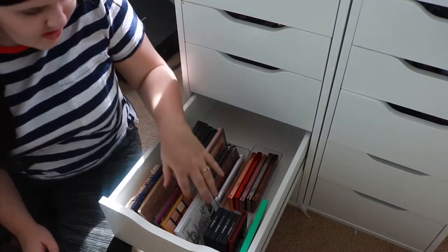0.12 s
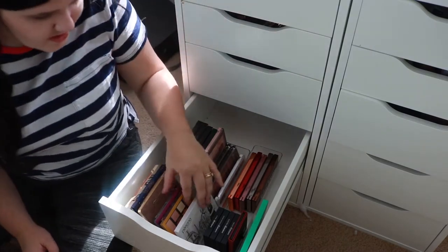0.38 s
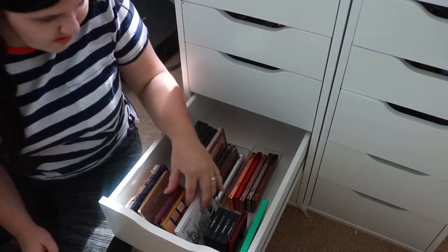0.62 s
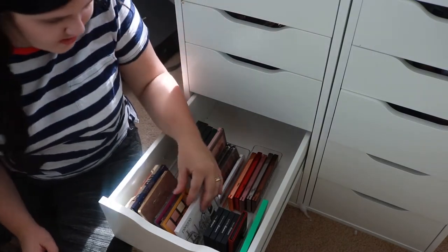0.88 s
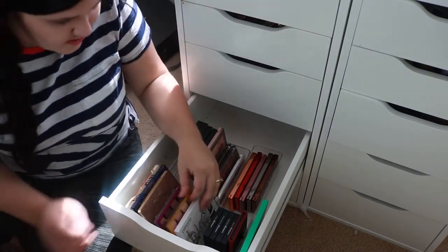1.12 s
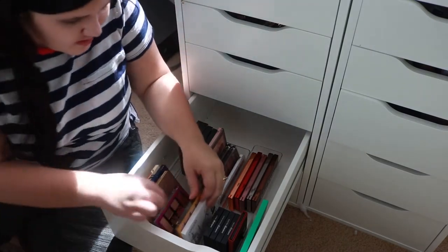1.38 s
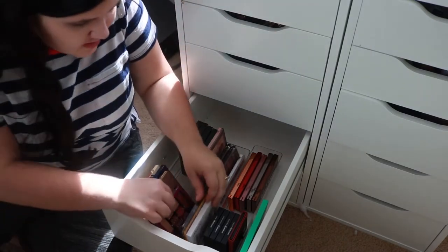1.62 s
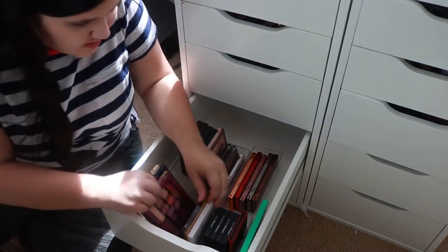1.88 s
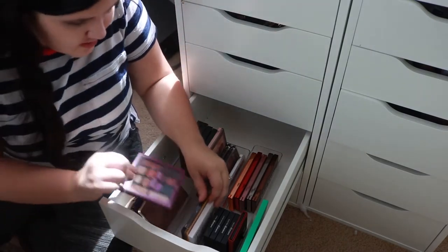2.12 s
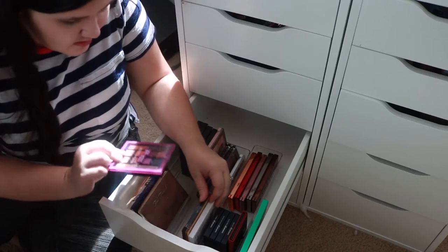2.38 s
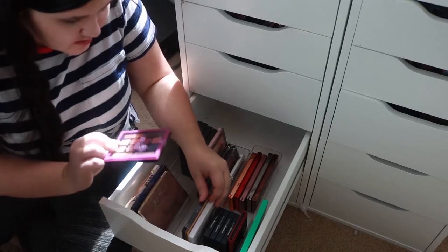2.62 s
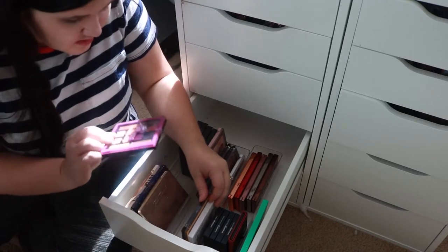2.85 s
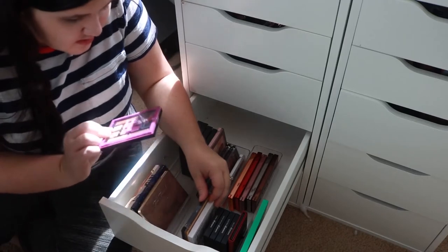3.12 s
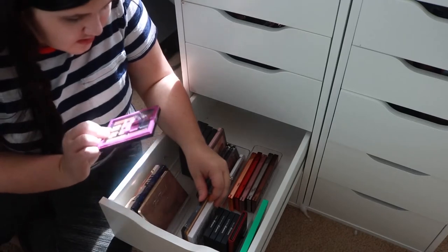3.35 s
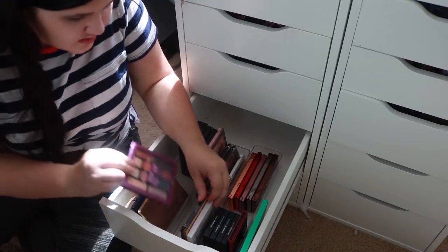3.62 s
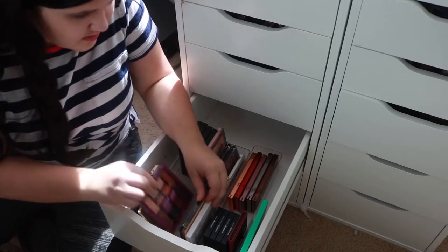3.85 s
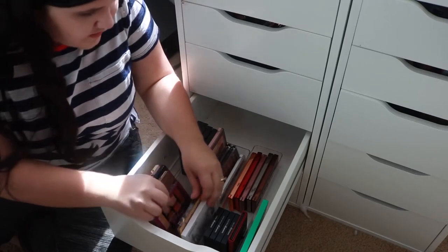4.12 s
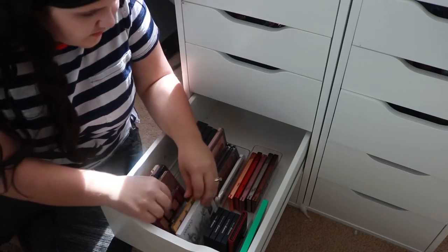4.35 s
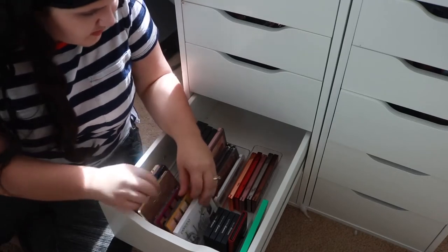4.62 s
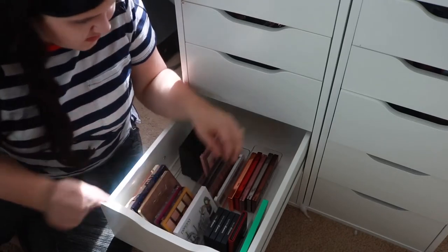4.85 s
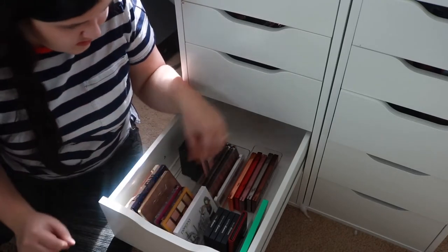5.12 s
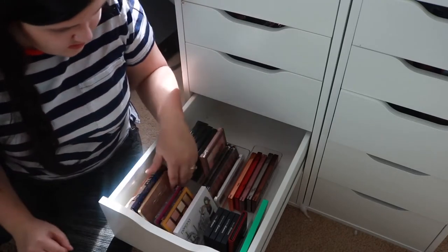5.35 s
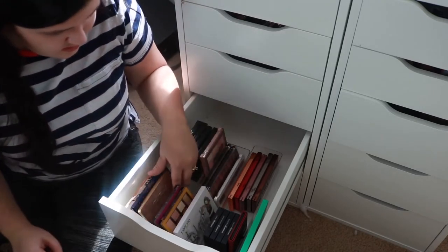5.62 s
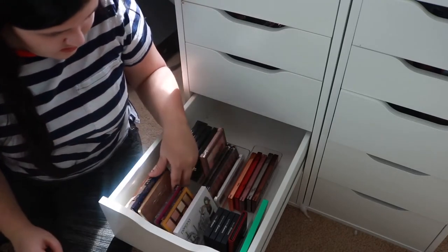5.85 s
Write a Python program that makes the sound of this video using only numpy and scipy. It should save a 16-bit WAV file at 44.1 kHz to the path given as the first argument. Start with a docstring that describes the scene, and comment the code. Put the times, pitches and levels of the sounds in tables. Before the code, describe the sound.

A quiet small furnished room, heard in stereo from arm's length, with a faint steady hiss whose treble flutters in tiny puffs. A soft finger rub opens at 0.1 s; very faint plastic ticks follow at 0.6 and 0.8. At 1.25 a light double knock of thin plastic cases touches the drawer. At 1.8 a firmer clack with a soft panel thud leads into a tenth of a second of fine gritty scraping as a case slides out, ending in a dry click at 2.15. Then near-silence with faint rubbing until 4.07. The case goes back in rapid clusters: rattling clacks at 4.1, harder ones at 4.2 to 4.3, and the loudest, a hollow knock with a deep drawer thump, at 4.4. Smaller clacks come at 4.6 and 4.8, a tiny tick at 5.0, then soft rubbing, with a short brush and a faint bright tick near 5.6. Echoes are short.

```python
"""Soft brushing of fingers over a faint hiss whose treble flickers, then plastic palettes knock in a wooden drawer
as they are tipped, pulled out and dropped back, an arm's length from a stereo camera.
Brushing and hiss are shaped noise. Each knock is a short rattle of contacts that rings the cases;
soft pushes ring the drawer panels, one case slides out with a gritty scrape, and a small furnished room answers."""
import sys
import numpy as np
from scipy import signal
from scipy.fft import rfft, irfft, next_fast_len
from scipy.io import wavfile
from scipy.ndimage import uniform_filter1d, minimum_filter1d

SR = 44100
rng = np.random.default_rng(int(sys.argv[2]) if len(sys.argv) > 2 else 0)


def to_wav(sig):
    """Store sig (one row per channel, or 1-D mono) as 16-bit WAV at the path in sys.argv[1].

    Samples outside -1..1 are clipped; the rate is SR.
    """
    pcm = np.clip(np.atleast_2d(sig), -1, 1) * 32767
    pcm = np.round(pcm).astype(np.int16)
    wavfile.write(sys.argv[1], SR, pcm.T)  # frames by channels


def magnitude_from_level(level_db):
    """Linear magnitude for a level in decibels (20 dB per decade)."""
    exponent = np.asarray(level_db, float) / 20
    return 10 ** exponent


N = 263718  # length in samples


def on_log(hz, table):
    """Reads a table, sliding evenly in pitch between its rows."""
    at, value = np.transpose(table)
    return np.interp(np.log(np.maximum(hz, 1)), np.log(at), value)


def band(x, lo_hz, hi_hz, order=2):
    """Keeps the sound between two frequencies."""
    return signal.sosfilt(signal.butter(order, [lo_hz, hi_hz], "band", fs=SR, output="sos"), x)


def unit(x):
    """Scales to rms 1."""
    return x / np.sqrt(np.mean(x ** 2))


def to_peak(x):
    """Scales to peak 1."""
    return x / np.abs(x).max()


def grit(size, spread_db):
    """Noise made of contacts of very unequal size."""
    return rng.standard_normal(size) * magnitude_from_level(spread_db * rng.exponential(size=size))


def ring(modes, tilt_db, size, detune=0):
    """One tap on an object: each of its modes is a sine that dies away; t60 is the time to fall 60 dB."""
    hz, db, t60 = np.transpose(modes)[:, :, None]
    t = np.arange(size) / SR
    tone = np.sin(2 * np.pi * hz * (1 + detune) * t)
    decay = np.exp(-np.log(1000) * t / t60)
    return np.sum(magnitude_from_level(db + tilt_db[:, None]) * tone * decay, axis=0)


# How strong the hiss is at each pitch, before it is scaled as a whole: f/Hz, level/dB
HISS_SPECTRUM = [(24, -67), (40, -45), (85, -32), (101, -12.5), (162, -4), (438, -9), (472, -8.5),
                 (591, -4.5), (926, -15.5), (1410, -10.5), (1600, -17), (2710, -1.5), (9410, -11),
                 (15500, -28.5)]
# How alike left and right are: f/Hz, likeness/0-1
HISS_LIKENESS = [(100, 0.98), (300, 0.78), (650, .6), (1400, 0), (15000, 0.26)]


def hiss():
    """Steady room tone and microphone hiss: noise with a fixed spectrum, partly shared by both sides."""
    level_db = -62.5
    size = next_fast_len(N)
    hz = np.fft.rfftfreq(size, 1 / SR)
    alike = np.clip(on_log(hz, HISS_LIKENESS), 0, 1)
    mid, side = rfft(rng.standard_normal((2, size))) * magnitude_from_level(on_log(hz, HISS_SPECTRUM))
    both = np.sqrt(1 + alike) * mid + np.sqrt(1 - alike) * side * np.array([[1], [-1]])
    return magnitude_from_level(level_db) * unit(irfft(both, size)[:, :N])


# Louder sound keeps more of its treble: level/dB, highest f/Hz kept, before luck lowers it
TREBLE_KEPT = [(-62.5, 2000), (-55.5, 5800), (-48, 9700), (-37, 10500), (-28.5, 16800)]


def flicker(x, loud):
    """The faint treble comes in puffs two or three beats apart; fading knocks lose their top."""
    beat_s, shut_db = 1024 / 48000, -29.5
    open_share = np.array([[.2], [.85]])  # chance of a puff on the left, on the right
    hop = round(beat_s * SR)
    hz, t, z = signal.stft(x, SR, nperseg=2 * hop, noverlap=hop)
    beats = len(t)
    puff = np.isin(np.arange(beats), np.cumsum(2 + (rng.random(beats) < .35)))
    luck = rng.random((4, beats))

    # loudest short moment of the knocks around each beat
    power = uniform_filter1d(np.mean(loud ** 2, axis=0), 128)
    loudest = -minimum_filter1d(-power, hop)
    at = np.minimum((t * SR).astype(int), N - 1)
    level_db = 10 * np.log10(loudest[at] + 1e-12)

    # every second puff opens on both sides; puffs open only while the knocks are quiet
    second = np.cumsum(puff) % 2 == 0
    is_open = puff & ((luck[:2] < open_share) | second) & (level_db < -60)
    top_hz = np.where(is_open, 13000 - 6000 * luck[2:] ** 3, 1500 + 2200 * luck[2:] ** 2.5)
    kept_hz = np.interp(level_db, *np.transpose(TREBLE_KEPT)) * (1 - 0.41 * luck[2:])
    top_hz = np.maximum(top_hz, kept_hz)

    # stray narrow strips stay open in the gaps
    strip = np.minimum(on_log(hz, [(500, 0), (16000, 39)]).astype(int), 39)
    stray = rng.random((2, 40, beats))[:, strip] < .1
    passes = (hz[:, None] < top_hz[:, None]) | (stray & (hz[:, None] < 7000))
    gain = np.where(passes, 1, magnitude_from_level(shut_db))
    return signal.istft(z * gain, SR, nperseg=2 * hop, noverlap=hop)[1][:, :N]


# Strokes of fingers and sleeve: firmest t/s, nominal level/dB, length/s, centre f/Hz, breadth/octaves
BRUSH_STROKES = [(.07, -59.5, 0.18, 2030, .75), (0.704, -68, 0.24, 1900, 0.48),
                 (1.04, -65.5, 0.28, 1620, 0.31), (1.454, -64.5, 0.28, 1860, 0.33),
                 (2.19, -63.5, 0.45, 1500, 1.44), (2.858, -70.5, 0.85, 1920, 0.34),
                 (4.696, -68.5, 0.96, 1750, .4), (5.4, -74, 0.63, 1740, 1), (5.603, -59, 0.083, 1840, 2.7)]


def brush():
    """Soft rubbing: each stroke swells and fades over the bands of noise near its centre."""
    fade_db = 10  # lost one length away from the firmest moment
    s, db, length, hz, octaves = np.transpose(BRUSH_STROKES)[:, :, None]
    away = np.abs(np.arange(N) / SR - s) / length
    power = magnitude_from_level(db - fade_db * away) ** 2 / octaves
    out = 0
    for centre_hz in 700 * 2 ** np.arange(0, 3, .4):
        share = np.exp(-2 * (np.log2(hz / centre_hz) / octaves) ** 2)
        rub = unit(band(grit((2, N), 0.75), centre_hz / 1.138, centre_hz * 1.19))
        out = out + np.sqrt(share[:, 0] @ power / 2) * rub
    return out


# Case against case: start t/s, peak level/dB of the case ring before the final filters, brightest f/Hz,
# rattle time scale/ms, edge treble level/dB relative to that peak
CASE_KNOCKS = [(0.62, -47.5, 2400, 3.7, -39), (.809, -45.5, 2660, 3.2, -32),
               (1.239, -52.5, 2000, 13.4, -16), (1.257, -34, 785, 7.4, -8), (1.273, -34, 2070, 6.36, -18),
               (1.793, -47.5, 1750, 34, -39), (1.819, -27.5, 2570, 10.7, -18),
               (1.826, -24.5, 940, 7.6, -38), (1.839, -26.5, 734, 2.2, -40), (1.856, -41, 880, 5.2, -40),
               (2.1446, -26.5, 3100, 1.5, -40), (4.076, -23, 3300, 18.2, -1), (4.085, -30.5, 2500, 14, -29),
               (4.099, -20.5, 1750, 8.8, -32), (4.120, -24.5, 1740, 8.6, -6), (4.130, -29, 650, 8.6, -28),
               (4.204, -18, 2900, 9.4, -7), (4.214, -23, 870, 4.4, -29), (4.250, -16.5, 3270, 9.1, 1.5),
               (4.259, -19, 1850, 3.7, -30), (4.281, -22.5, 2000, 4.5, -8.5),
               (4.384, -20.5, 2700, 3.2, -25), (4.391, -17, 920, 7.7, -10), (4.400, -19.5, 710, 6.3, -35),
               (4.407, -12.5, 2670, 8, -8.5), (4.413, -18.5, 2650, 2.2, -12),
               (4.587, -43.5, 2000, 4.4, -22), (4.601, -31, 2620, 5.4, -10), (4.607, -30.5, 1470, 8.3, -8),
               (4.616, -38, 2500, 5.4, -9), (4.805, -35.5, 3000, 31, -14.5), (4.817, -25, 2400, 8.3, -8),
               (4.827, -29, 686, 2.65, -43), (4.833, -43, 1400, 4.4, -31), (4.988, -45, 2960, 2.7, -25),
               (5.657, -46.5, 4100, 2.7, 1.5)]
# Ringing of the thin plastic cases, also used by the slide: f/Hz, level/dB, t60/s
CASE_MODES = [(657, -13, 0.033), (742, -6.5, 0.14), (935, -10.5, 0.045), (954, 4.5, 0.025),
              (1197, 0.5, 0.031), (1330, 0, 0.017), (1580, -3.5, 0.047), (1784, -2.5, 0.061),
              (2000, 6, 0.015), (2240, 2, .02), (2500, 0, 0.018), (2746, 8.5, 0.011), (2737, 6, 0.0077),
              (3180, 3.5, 0.016), (3330, 3, 0.018), (3716, 8, 0.01), (4104, 10.5, 0.0082), (5030, 8, 0.016)]


def knocks(size=6144):
    """Each knock rattles for some ms; where it lands sets which modes speak. Returns left, right, room feed."""
    out, t = np.zeros((3, N + size)), np.arange(size) / SR
    damped = np.array(CASE_MODES) * [1, 1, .3]
    edge_tap = band((t == 0) * 1.0, 2240, 6940)
    for s, db, hz, ms, treble_db in CASE_KNOCKS:
        u = t / (ms / 1000)
        shape = u ** 1.6 * np.exp(-4.0 * u)
        rattle = grit(size, 1.7) * shape
        # a brief point contact wakes fewer modes
        tilt_db = -(8.0 + 10.5 / ms) * np.abs(np.log2(damped[:, 0] / hz))
        # no two cases are tuned alike
        detune = 0.067 * rng.standard_normal((len(CASE_MODES), 1))
        uneven_db = 0.5 * rng.standard_normal(len(CASE_MODES))
        modes = ring(CASE_MODES, tilt_db + uneven_db, 2048, detune)
        click = ring(damped, tilt_db, size)
        response = unit(modes) + 0.15 * unit(click[:2048])
        case = to_peak(signal.fftconvolve(rattle, response)[:size])
        # the short treble of the edges reaches the two microphones by different paths
        edge = magnitude_from_level(treble_db) * to_peak(band(grit((2, size), 3.7) * shape, 3960, 6100))
        # the walls hear the case from all sides, so its peaks and notches even out
        feed = unit(click) * np.std(case) + unit(edge_tap) * np.std(edge)
        i = int(s * SR)
        out[:, i:i + size] += magnitude_from_level(db) * np.vstack([case + edge, feed])
    return out[:, :N]


# How long the room's echoes last: f/Hz, t60/s
ECHO_T60 = [(150, 0.67), (500, 0.35), (1500, 0.29), (4000, 0.29), (10000, 0.12)]


def room(x, size=18000):
    """Dense echoes, each band dying at its own rate; the bass reaches both sides alike."""
    level_db, gap_s = -4.5, 0.0023
    t, tail = np.arange(size) / SR, 0
    for hz in 125 * 2. ** np.arange(0, 7, .25):
        mid, side = band(rng.standard_normal((2, size)), hz / 2 ** 0.23, hz * 2 ** 0.19, order=1)
        wide = min(hz / 1300.0, 1)
        decay = np.exp(-np.log(1000) * t / on_log(hz, ECHO_T60))
        tail = tail + (mid + wide * side * np.array([[1], [-1]])) * decay
    # silent for one gap, then rising to full over a second one
    tail = tail * np.clip(t / gap_s - 1, 0, 1)
    tail = tail / np.sqrt(np.sum(tail ** 2) / 2)
    return magnitude_from_level(level_db) * signal.fftconvolve(x[None], tail, axes=1)[:, :N]


# Case against the drawer: t/s, peak level/dB before the final filters, panel f/Hz nearest the blow
DRAWER_THUMPS = [(1.257, -36, 300), (1.273, -29, 270), (1.826, -34, 420), (1.839, -25, 414),
                 (1.856, -27.5, 406), (4.102, -27.5, 290), (4.119, -24, 276), (4.130, -20, 297),
                 (4.204, -18.5, 410), (4.214, -18, 306), (4.250, -16, 515), (4.258, -21.5, 275),
                 (4.281, -17.5, 273), (4.384, -21, 450), (4.391, -8.5, 460), (4.400, -20.5, 312),
                 (4.407, -13, 259), (4.608, -21.5, 404), (4.827, -27.5, 500), (4.833, -33, 293)]
# Ringing of the drawer panels before they are smothered: f/Hz, level/dB, t60/s
DRAWER_MODES = [(254, 0, .36), (273, -4, .25), (290, -5, .22), (318, -6, .12), (378, -4, .14),
                (415, -2, .18), (458, -4, .13), (543, 0, .16)]


def thumps(size=6144):
    """The heavy panels feel a blow as one soft push. Returns left, right and room feed."""
    out, t = np.zeros(N + size), np.arange(size) / SR
    push = t * np.exp(-t / 0.0015)
    for s, db, hz in DRAWER_THUMPS:
        tilt_db = -26.0 * np.abs(np.log2(np.array(DRAWER_MODES)[:, 0] / hz))
        wood = signal.fftconvolve(push, ring(DRAWER_MODES, tilt_db, size))[:size]
        # the cases settle back on the panels and smother them
        smother = np.exp(-(t / 0.086) ** 3)
        i = int(s * SR)
        out[i:i + size] += magnitude_from_level(db) * to_peak(wood * smother)
    return out[:N] * np.array([[1], [1], [.15]])


def slide():
    """A case drawn out between its neighbours: fine stick-slip grit rings it, easing as it comes free."""
    start_s, free_s = 1.86, 1.9745
    start_db, ease_db, stop_db_per_s = -48, -5, -1100
    edge_db, edge_rise_db = -13.5, 12  # the bare edge grows brighter, relative to the rest
    t = np.arange(N) / SR
    drawn = np.clip((t - start_s) / (free_s - start_s), 0, 1)
    db = start_db + ease_db * drawn ** 2 + stop_db_per_s * np.maximum(t - free_s, 0)
    # the grip comes and goes every few ms
    grip = uniform_filter1d(np.repeat(rng.standard_normal(N // 200 + 1), 200)[:N], 100)
    scrape = grit(N, 1.0) * magnitude_from_level(2.2 * grip)
    # some modes are held back by up to 5 dB, in waves along the pitch axis
    tilt_db = -5.0 * np.abs(np.cos(np.log2(np.array(CASE_MODES)[:, 0] / 1760.0) * 3.4))
    body = signal.fftconvolve(scrape, ring(CASE_MODES, tilt_db, 2048))[:N]
    low = unit(unit(band(body, 760, 3700)) + 0.67 * unit(band(scrape, 670, 2700)))
    edge = magnitude_from_level(edge_db + edge_rise_db * drawn) * unit(band(scrape, 3300, 5700))
    return (t > start_s) * magnitude_from_level(db) * (low + edge)


def scene():
    """Cases and drawer in the room, over the background; the faint treble flickers."""
    # small objects radiate little bass, and soft plastic little top
    near = band(knocks() + thumps() + slide(), 255, 12500, order=4)
    near = band(near, 222, 16000, order=3)
    # the right side is 1.4 dB louder in the direct sound
    near = magnitude_from_level([[-0.7], [0.7]]) * near[:2] + room(near[2])
    return flicker(near + hiss() + brush(), near)


def top_cut(x):
    """Nothing passes above the cut-off."""
    return signal.sosfilt(signal.butter(12, 15700, fs=SR, output="sos"), x)


def record(dry):
    """The microphones cut the deep bass, below about 110 Hz."""
    mix = signal.sosfilt(signal.butter(3, 110, "high", fs=SR, output="sos"), dry)
    return top_cut(mix)


dry = scene()
out = record(dry)
to_wav(out)
```